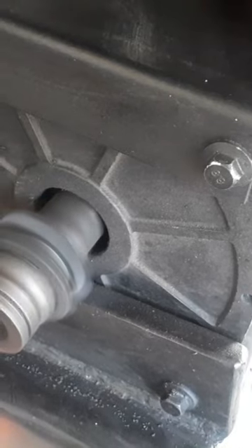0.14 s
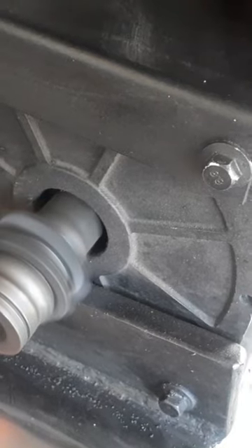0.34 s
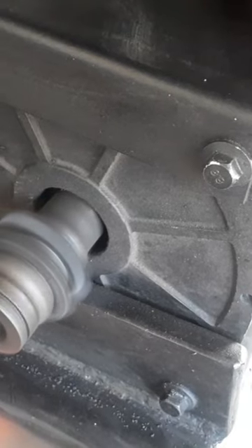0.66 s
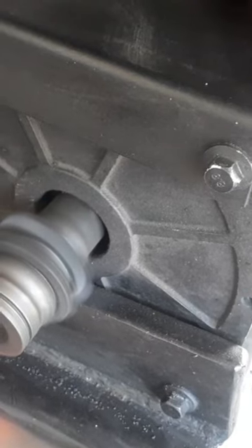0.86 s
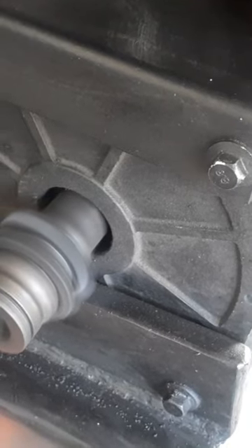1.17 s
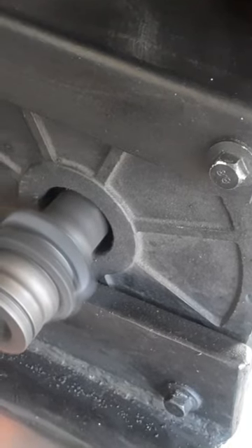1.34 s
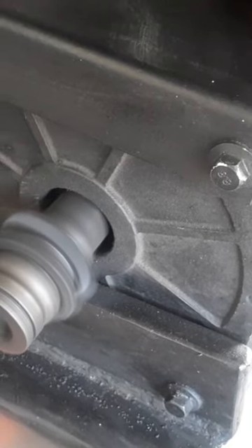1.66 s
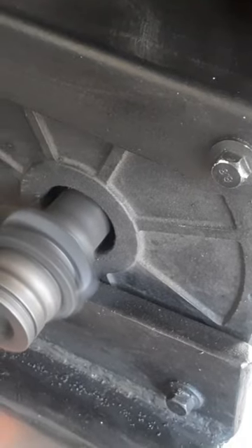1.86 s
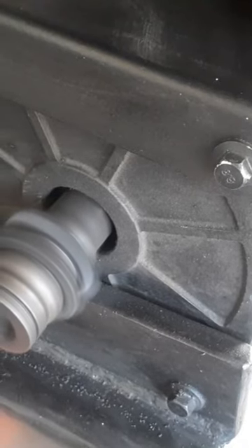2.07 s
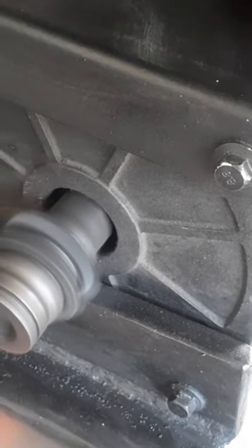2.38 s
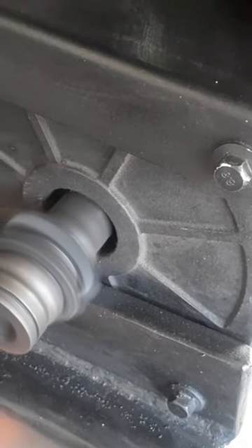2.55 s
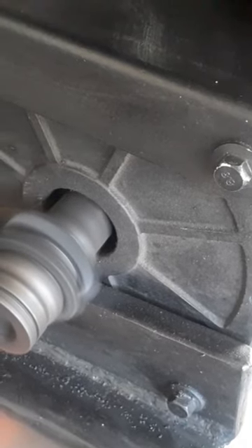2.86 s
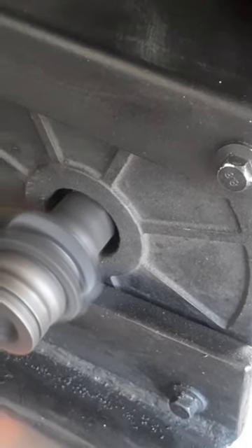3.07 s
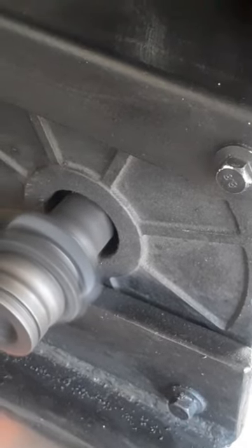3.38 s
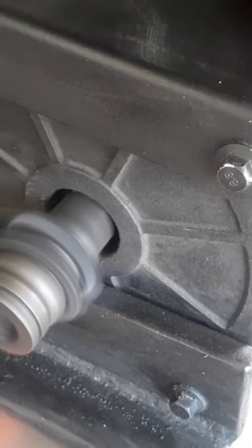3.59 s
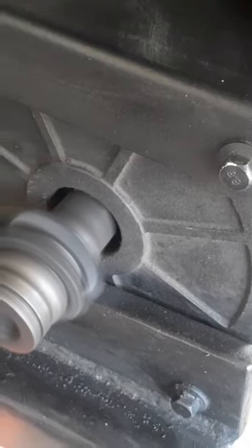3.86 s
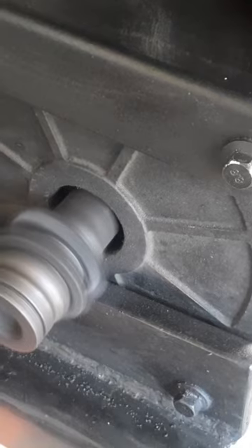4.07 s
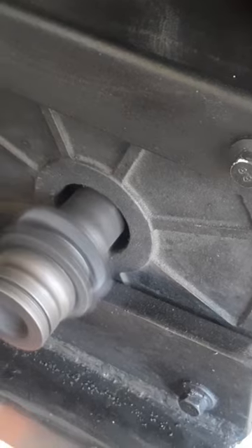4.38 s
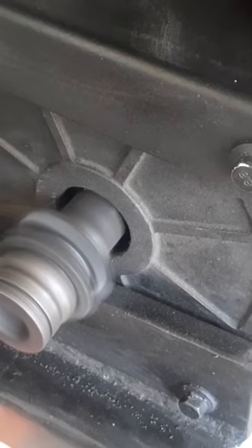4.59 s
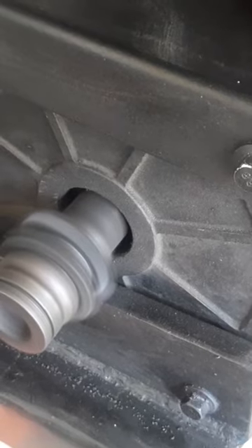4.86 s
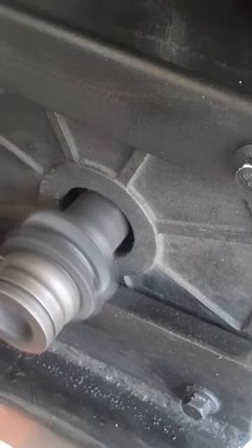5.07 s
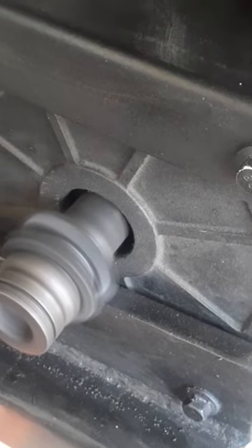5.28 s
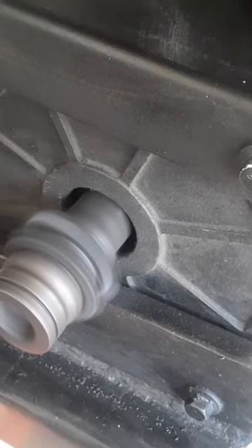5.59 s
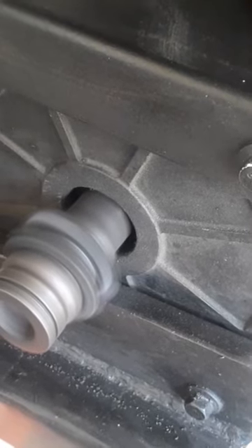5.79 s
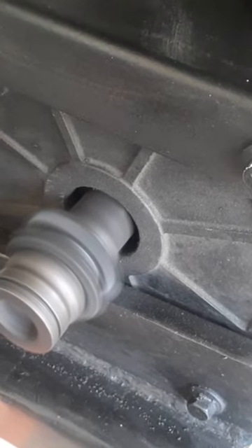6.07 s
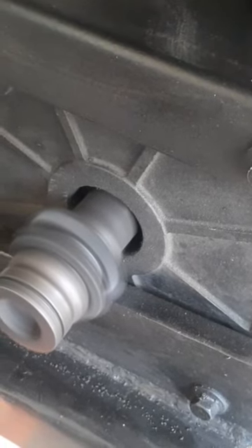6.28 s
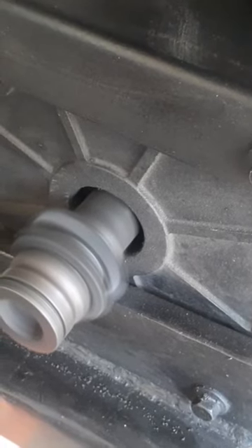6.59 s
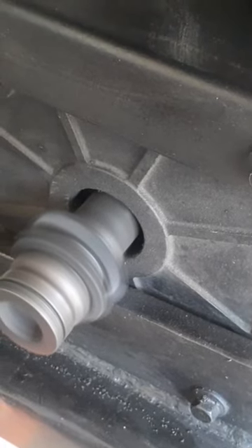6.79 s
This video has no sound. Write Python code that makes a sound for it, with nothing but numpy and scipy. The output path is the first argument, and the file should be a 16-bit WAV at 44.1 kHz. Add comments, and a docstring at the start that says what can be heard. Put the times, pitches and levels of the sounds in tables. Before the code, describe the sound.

Close electric motor and gearbox spin freely: layered whines dip, rise fast, glide down, then climb to the end over raspy, hissing bearings.

```python
"""A low gear hum and a higher whine sink in pitch as an unloaded electric drive, close by, coasts.
It speeds up, coasts again, then climbs steadily. The hum swells and fades in the gearbox's resonances;
three motor orders (multiples of the hum pitch) whine, and the odd two flare in the casing's strongest mode.
Bearing and gear side tones grow with speed, oil churns, bearings rasp and hiss, and the inverter whistles
thinly on top. Drive and room rumble low, the housing drones softly, and a workshop answers with echoes."""
import sys
import numpy as np
from scipy import signal
from scipy.fft import rfft, irfft, next_fast_len
from scipy.io import wavfile
from scipy.ndimage import uniform_filter1d, map_coordinates

SR = 44100
rng = np.random.default_rng(int(sys.argv[2]) if len(sys.argv) > 2 else 0)


def put_to_file(sound):
    """Save the sound as 16-bit audio at rate SR, in the file named by the first command-line argument."""
    columns = np.atleast_2d(sound).T  # one column per channel
    safe = np.clip(columns, -1, 1)
    whole_steps = np.round(safe * 32767)
    wavfile.write(sys.argv[1], SR, whole_steps.astype(np.int16))


N = 306054  # length in samples

REFERENCE_HZ = 640  # hum pitch at which speed counts as 1
# which side each frequency favours: frequency_hz, left_over_right_db
LEAN = [(80, 1), (400, -2.5), (1200, -0.5), (2300, 4), (4400, 6), (8000, 3), (14000, 9.5)]


def amp(db):
    """Turn decibels into gain."""
    return 10 ** (np.asarray(db) / 20)


def unit(x):
    """Scale to rms (average strength) 1."""
    return x / np.sqrt(np.mean(x ** 2) + 1e-20)


def along(points, hz):
    """Read a table of (frequency, value) between its points, on a log frequency axis."""
    table_hz, values = np.transpose(points)
    return np.interp(np.log(hz + 1), np.log(table_hz), values)


def curve(points):
    """Draw straight lines between (time, value) points, one value per sample."""
    times_s, values = np.transpose(points)
    return np.interp(np.arange(N) / SR, times_s, values)


def wobble(rate):
    """Draw a smooth random curve through `rate` random points a second."""
    coarse = np.arange(0, N + 32, 32)  # every 32nd sample is enough
    points = rng.standard_normal(int(N * rate / SR) + 4)
    smooth = map_coordinates(points, [coarse * rate / SR])
    return np.interp(np.arange(N), coarse, smooth)


def filtered(x, response):
    """Multiply the spectrum of x by a response, which may shift phase as well as level."""
    size = next_fast_len(N + SR // 4)  # spare room, so that ringing does not wrap round
    shaped = rfft(x, size) * response(np.fft.rfftfreq(size, 1 / SR))
    return irfft(shaped, size)[..., :N]


def resonance(f, centre_hz, width_hz):
    """Give the response of one vibrating mode, 1 at its centre."""
    damping = 1j * f * width_hz
    return damping / (centre_hz ** 2 - f * f + damping)


def pan(db):
    """Give left and right gains, db apart, of constant total power."""
    gains = amp(np.array([db, -db]) / 2)
    return gains / np.sqrt(np.mean(gains ** 2, axis=0))


def tone(turns):
    """Make a sine of rms 1 from a count of turns."""
    return np.sqrt(2) * np.sin(2 * np.pi * turns)


def echoes(x, decay):
    """Smear x over fading noise, different for each microphone; decay holds (Hz, s to fade by 60 dB)."""
    hz, t, bands = signal.stft(rng.standard_normal((2, SR // 2)), SR, nperseg=256)
    fade = amp(-60 * t / along(decay, hz)[:, None])
    tail = signal.istft(bands * fade, SR, nperseg=256)[1]
    tail = tail / np.linalg.norm(tail[0])
    return signal.fftconvolve(np.atleast_2d(x), tail, axes=1)[:, :N]


def in_room(x, wet_db):
    """Add the workshop's echoes to the direct sound and keep the power about the same."""
    # how long the workshop rings: frequency_hz, fade_by_60_db_s
    workshop = [(200, 0.28), (1500, 0.24), (10000, 0.045)]
    wet = amp(wet_db)
    return (x + wet * echoes(x, workshop)) / np.hypot(1, wet)


def hum(turns, pitch):
    """Hum almost purely, shaken by the teeth, through gearbox resonances; the right microphone leads."""
    # the gearbox's answer, the same going up and coming down: hum_pitch_hz, level_db, left_over_right_db
    gearbox = [(159.0, -49.5, -3.0), (191.0, -44.0, -9.0), (207.0, -36.5, 5.0), (248.0, -42.5, -10.5),
               (288.0, -28.5, 0.0), (376.0, -43.5, 7.5), (397.0, -24.0, -0.5), (424.0, -20.5, -5.5),
               (442.0, -12.0, -4.5), (469.0, -18.0, -1.0), (533.0, -16.0, -2.5), (551.0, -22.0, 8.5),
               (569.0, -30.0, -7.5), (605.0, -30.5, 3.0), (611.0, -46.0, -6.5), (621.0, -27.0, -7.5),
               (695.0, -20.5, -0.0)]
    hz, levels_db, leans_db = np.transpose(gearbox)
    ring_lag_s = 0.008  # the resonances follow the pitch this late
    t = np.arange(N) / SR
    ringing_hz = np.interp(t - ring_lag_s, t, pitch)
    level_db = np.interp(ringing_hz, hz, levels_db) + 0.89 * wobble(40)
    lean_db = np.interp(ringing_hz, hz, leans_db)
    shaken = turns + 0.0045 * wobble(60)
    left_and_right = tone(np.array([shaken - 0.08, shaken]))
    return amp(level_db) * pan(lean_db) * left_and_right


def off_walls(x):
    """Add reflections off nearby walls, which ripple a tone's level as it glides."""
    # lateness of each reflection: delay_s
    delays = [.00292, .00338, .00796, .00838, .0088]
    gain = 0.18  # of each reflection
    return filtered(x, lambda f: 1 + gain * sum(np.exp(-2j * np.pi * f * s) for s in delays))


def arrival(f):
    """Shift the phase between microphones, as the casing's walls reach them out of step."""
    # how far the left microphone is ahead: frequency_hz, phase_radians
    lead = [(400, 0.63), (1000, 1.45), (2000, 1.37), (3300, 2.06), (4600, 1.1), (9000, 1.17)]
    return np.exp(np.array([[1], [-1]]) * 1j * along(lead, f) / 2)


def casing_ring(x):
    """Give what the casing's strongest mode adds, mostly on the right."""
    # the mode: centre_hz, width_hz
    casing_mode = (1720, 70)
    left_right = np.array([[1.0], [4.2]])
    return filtered(x, lambda f: left_right * resonance(f, *casing_mode))


def whine(turns, pitch):
    """Sweep three fluttering motor orders through the casing; two overtones sound only in other modes."""
    # strength of each order at the frequency it has reached, ahead of casing and room: frequency_hz, level_db
    fifth = [(720, -46), (1350, -35.5), (1550, -22.5), (1730, -21.5), (1830, -26), (2130, -24), (2300, -35),
             (2700, -39), (3020, -28.5), (3500, -32)]
    sixth = [(900, -25.5), (1130, -27.5), (2150, -22), (2560, -32.5), (2980, -27), (3120, -35.5),
             (3450, -33), (4200, -36)]
    seventh = [(1000, -41), (1450, -29), (1700, -23.5), (2230, -28), (2650, -41), (3000, -33.5),
               (3900, -39), (4900, -40)]
    shaken = turns + 0.0072 * wobble(90)

    def fluttering(order, db):
        return amp(db + 1.26 * wobble(70)) * tone(order * shaken)

    def swept(order, strength):
        return fluttering(order, along(strength, order * pitch))

    def wall_response(f):
        rib = 1 + 0.5 * resonance(f, centre_hz=3044, width_hz=220)
        return rib * pan(along(LEAN, f)) * arrival(f)

    def cover_response(f):
        upper_mode = resonance(f, centre_hz=3540, width_hz=250)
        lower_mode = 0.5 * resonance(f, centre_hz=1860, width_hz=66)
        return (upper_mode + lower_mode) * pan(along(LEAN, f))

    odd_force = swept(order=5, strength=fifth) + swept(order=7, strength=seventh)
    odd = filtered(off_walls(odd_force), wall_response)
    even = filtered(off_walls(swept(order=6, strength=sixth)), wall_response)
    overtones = fluttering(order=10, db=-37.5) + fluttering(order=13, db=-35)
    upper = filtered(amp(4.8 * wobble(25.1)) * overtones, cover_response)
    return in_room(odd + even + upper, wet_db=-7) + casing_ring(odd)


def bearings(turns, speed):
    """Add side tones of bearings and gears that grow with speed and ring in the housing and casing."""
    # pitch of each weak side tone: multiple_of_hum_pitch
    orders = [.9, 1.1, 1.61, 1.69, 2, 2.07, 2.17, 2.25, 2.49, 2.72, 3, 3.4, 3.83, 4, 4.69, 4.79, 4.89, 5.17,
              6.93, 7.51]
    # level of each, before speed and housing change it: level_db
    levels_db = [-46, -39, -56.5, -46.5, -48, -46.5, -57.5, -57.5, -50, -48, -43.5, -52, -54, -42, -51, -45,
                 -47, -39, -45, -42]
    # how well the housing radiates them: frequency_hz, gain_db
    housing = [(380, -8), (445, 7), (520, 2.5), (600, -10.5), (700, -3.5), (790, -7.5), (920, -14.5),
               (1000, 1.5), (1080, 2.5), (1400, -4), (2500, -3.5)]
    named = 0
    for order, db in zip(orders, levels_db):
        named = named + amp(db + 3.2 * wobble(9)) * tone(order * turns + 0.11 * wobble(25))
    # 36 weaker tones at random multiples from 2 to 14
    thicket = 0
    for weak, where, phase in rng.random(size=(36, 3)):
        thicket = thicket + amp(-8 * weak) * tone((2 + 12 * where) * turns + phase)
    driven = (named + amp(-47) * thicket) * speed ** 1.47
    tones = filtered(driven, lambda f: amp(along(housing, f)))
    return in_room(tones, wet_db=1.0) + amp(-3) * casing_ring(tones)


def inverter(turns, pitch):
    """Fan out sidebands of the switching rate as the speed rises; one thin whistle stays put."""
    # the loudest whistle: switching_hz, multiple_of_hum_pitch_added
    main_band = (10000, -1.5)
    # it flares as it slides through a resonance: whistle_hz, level_db
    flare = [(8950, -31), (9040, -36), (9115, -27), (9175, -48), (9210, -46), (9480, -55), (9575, -45),
             (9690, -56), (9790, -54)]
    # the fainter whistles: switching_hz, multiple_of_hum_pitch_added
    faint_bands = [(10000, -2.5), (10000, .5), (10000, 1.5), (10000, 2.5), (16100, -1), (16100, -2)]
    # level of each at the reference speed, before the room: level_db
    faint_db = [-45, -54, -46, -46, -51, -50]
    t = np.arange(N) / SR

    def sideband(switching_hz, multiple):
        return amp(1.4 * wobble(14)) * tone(switching_hz * t + multiple * turns)

    switching_hz, multiple = main_band
    main = amp(along(flare, switching_hz + multiple * pitch)) * sideband(*main_band)
    faint = sum(amp(db) * sideband(*band) for band, db in zip(faint_bands, faint_db))
    faint = faint * (pitch / REFERENCE_HZ) ** 1.5
    steady = amp(-56) * tone(12080 * t)
    return in_room(filtered(main + faint + steady, arrival), wet_db=-8)


def rush(colour, ring_t60, own_db):
    """Make rms-1 noise that rings for ring_t60 s, plus a part of each microphone's own."""
    # likeness of left and right, 1 for the same: frequency_hz, likeness
    alike = [(100, 0.97), (450, 0.77), (1000, 0), (3000, 0), (14000, 0.14)]
    lowest_hz, highest_hz = colour[0][0], colour[-1][0]
    rung = echoes(rng.standard_normal(N), [(1000, ring_t60)])
    pair = rung + amp(own_db) * rng.standard_normal((2, N))

    def mid_side_response(f):
        below = 1 + (lowest_hz / (f + 1)) ** 40
        above = 1 + (f / highest_hz) ** 40
        skirts = 1 / np.sqrt(below * above)  # steep edges outside the table
        # less likeness moves power from mid (shared) to side (opposed)
        angle = np.arccos(np.clip(along(alike, f), -1, 1)) / 2
        return amp(along(colour, f)) * skirts * np.array([np.cos(angle), np.sin(angle)])

    mid, side = filtered(pair, mid_side_response)
    return unit(np.array([mid + side, mid - side]))


def running_noise(turns, pitch):
    """Churn oil at its own slowly changing level; rasp and hiss bearings harder with speed and torque."""
    # colours of the three noises: frequency_hz, density_db_per_hz
    churn_colour = [(200, -30), (360, -23), (450, -22), (560, -14.5), (760, -12.5), (1050, -8.5),
                    (1450, -3.5), (2000, -8), (2650, -10.5), (3000, 2), (3500, -10)]
    rasp_colour = [(3600.0, -5), (4000.0, -10.5), (4450.0, -1.5), (4850.0, -10), (5450.0, 2.5),
                   (5900.0, -12.5), (6250.0, -12.5), (6900.0, -10), (7400.0, -5.5), (8200.0, -26.5)]
    hiss_colour = [(8200, 4), (8700, -7), (9150, 2.5), (10000, -5), (10700, -0.5), (11400, 1.5),
                   (12000, -1), (12800, 0.5), (13600, -8), (14600, -2.5), (15100, -10)]
    # oil churn hardly follows the speed: time_s, level_db
    churn_level = [(0, -29.5), (.45, -33.5), (1.44, -29), (2.3, -32.5), (3.04, -31), (4.3, -35.5),
                   (6, -32.5), (6.93, -29)]
    full_hz_per_s = 370  # rise of hum pitch that counts as full torque
    speed = pitch / REFERENCE_HZ
    pull = np.clip(np.gradient(pitch) * SR / full_hz_per_s, 0, 1)
    torque = uniform_filter1d(pull ** 2, size=8000)
    # rasp grows by 8 dB for each doubling of speed
    rasp_db = -26.5 + 8 * np.log2(speed) + 2.5 * torque
    # hiss climbs from its level at rest to that at the reference speed
    hiss_rest_db, hiss_reference_db = -51.5, -28
    hiss_db = hiss_rest_db + (hiss_reference_db - hiss_rest_db) * speed ** 1.3 + 2 * torque
    # all three throb lightly with the shaft
    shaft = turns / 10
    throb_db = 0.24 * tone(shaft) + 0.5 * wobble(45) + 0.45 * wobble(12)
    churn = amp(curve(churn_level)) * rush(churn_colour, ring_t60=0.1, own_db=-6.5)
    rasp = amp(rasp_db) * rush(rasp_colour, ring_t60=0.087, own_db=-3)
    hiss = amp(hiss_db) * rush(hiss_colour, ring_t60=0.059, own_db=-6.5)
    return amp(throb_db) * (churn + rasp + hiss)


def background():
    """Rumble low as drive and room, and drone in the housing's lowest mode, both made from noise."""
    # low rumble of drive and room, strongest at the end: time_s, level_db
    rumble_level = [(0.0, -53), (1.3, -56.5), (4.5, -59.5), (6.2, -53.5), (6.94, -47.5)]
    # its colour: frequency_hz, density_db_per_hz
    rumble_colour = [(15, -48), (25, -33), (54, -5.5), (100, -2.5), (167, -3), (231, -3.5), (275, -4),
                     (330, -8.5), (430, -41), (730, -120)]
    # drone of the housing: time_s, level_db
    drone_level = [(0, -43), (1.3, -42), (2.5, -48.5), (5, -46.5), (6.9, -50)]
    # the housing's lowest mode: centre_hz, width_hz
    boom_mode = (458.5, 39)

    def drone_response(f):
        # the second factor thins the mode's skirts
        return resonance(f, *boom_mode) / np.hypot(1, (f - boom_mode[0]) / 90)

    rumble = amp(curve(rumble_level)) * rush(rumble_colour, ring_t60=0.04, own_db=4.0)
    drone = unit(filtered(rng.standard_normal(N), drone_response))
    return rumble + amp(curve(drone_level)) * drone


def scene():
    """Let one speed drive the machine's tones, rasp and hiss over a soft, slowly changing background."""
    # the drive's speed, to which its tones are tied: time_s, hum_pitch_hz
    speed_path = [(0.0, 207.2), (0.563, 141.5), (0.811, 168.7), (1.212, 201.7), (1.551, 330.1),
                  (2.046, 504.5), (2.515, 426.4), (3.045, 344.9), (3.636, 414.9), (4.181, 471.9),
                  (4.803, 528.6), (5.287, 568.9), (5.858, 609.8), (6.303, 635.2), (6.791, 654.0),
                  (6.859, 685.0), (6.94, 703.0)]
    pitch = uniform_filter1d(curve(speed_path), size=1200, mode="nearest")
    turns = np.cumsum(pitch) / SR
    rest = bearings(turns, pitch / REFERENCE_HZ) + inverter(turns, pitch)
    rest = rest + running_noise(turns, pitch) + background()
    leaning = filtered(rest, lambda f: pan(along(LEAN, f)))  # treble favours the left
    return hum(turns, pitch) + whine(turns, pitch) + leaning


def record(dry):
    """Remove everything above 15.5 kHz."""
    top_hz = 15500
    return filtered(dry, lambda f: f < top_hz)


dry = scene()
out = record(dry)
put_to_file(out)
```